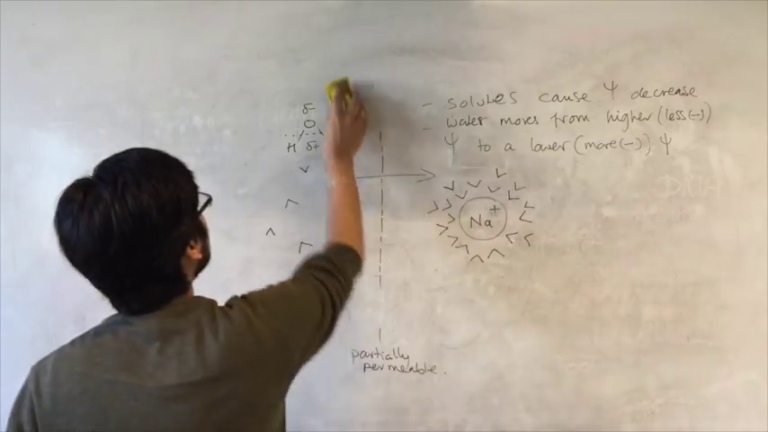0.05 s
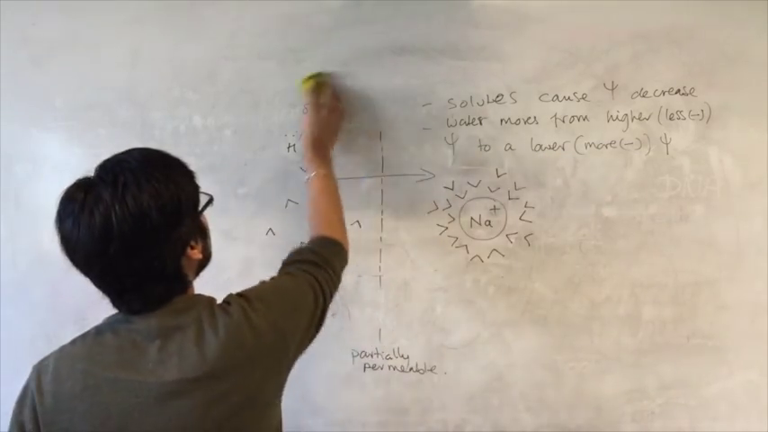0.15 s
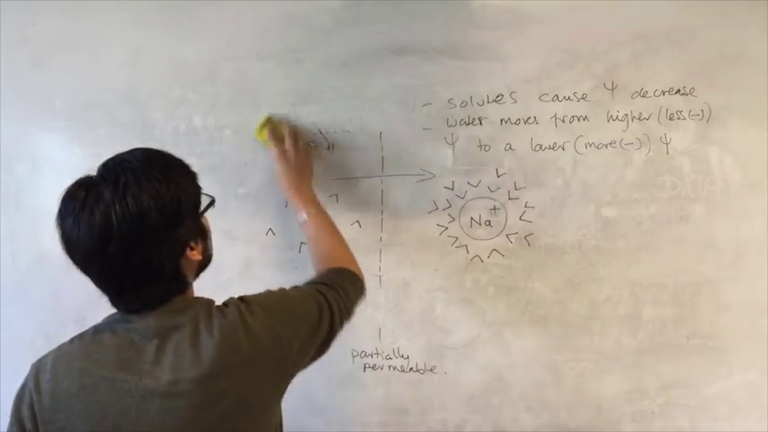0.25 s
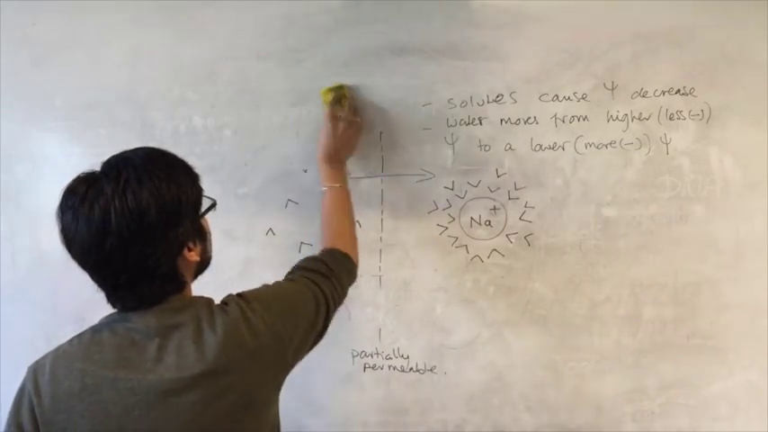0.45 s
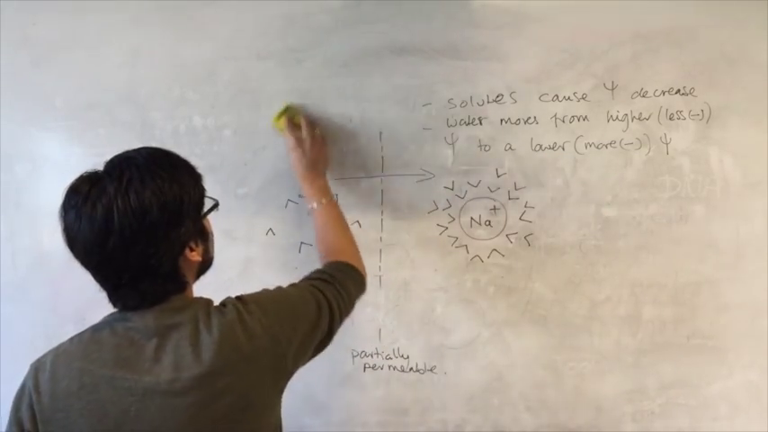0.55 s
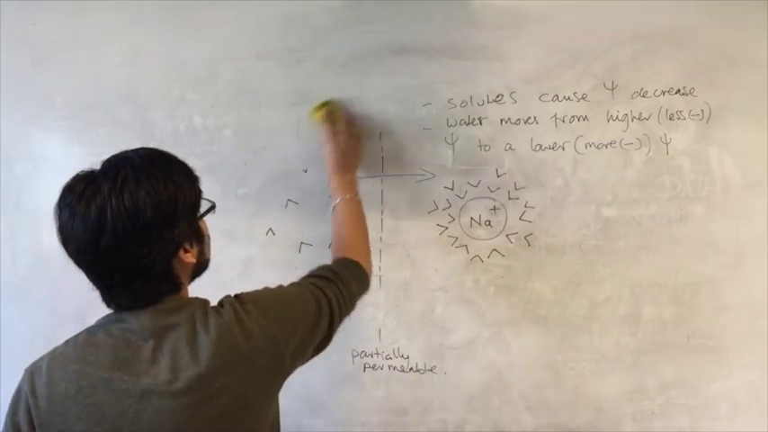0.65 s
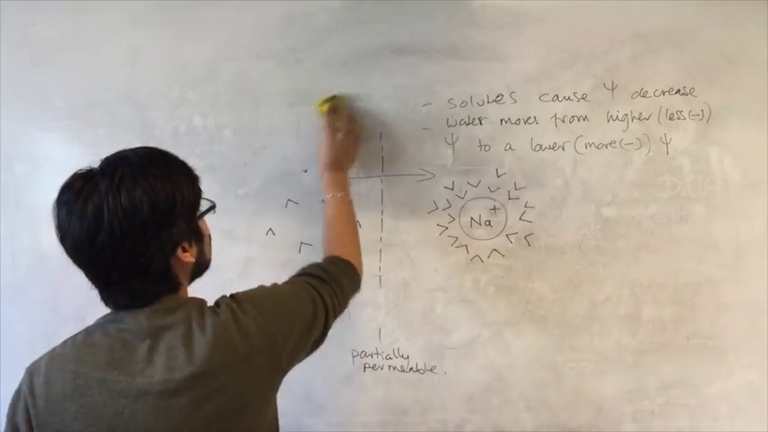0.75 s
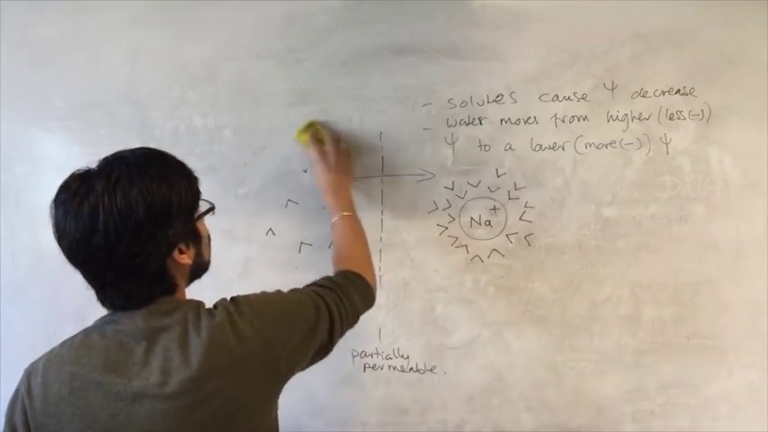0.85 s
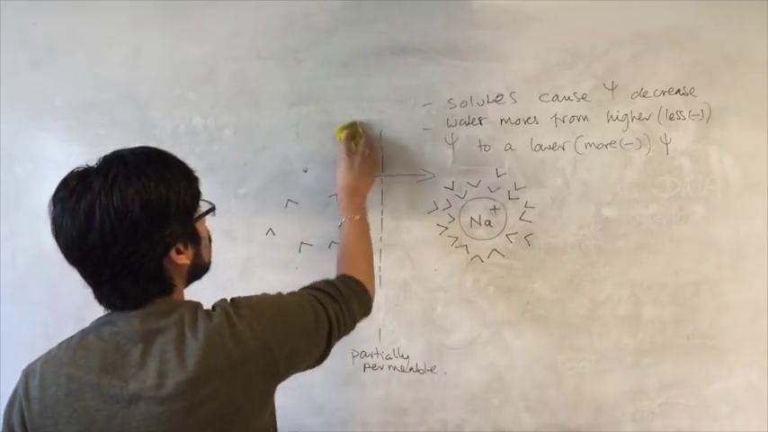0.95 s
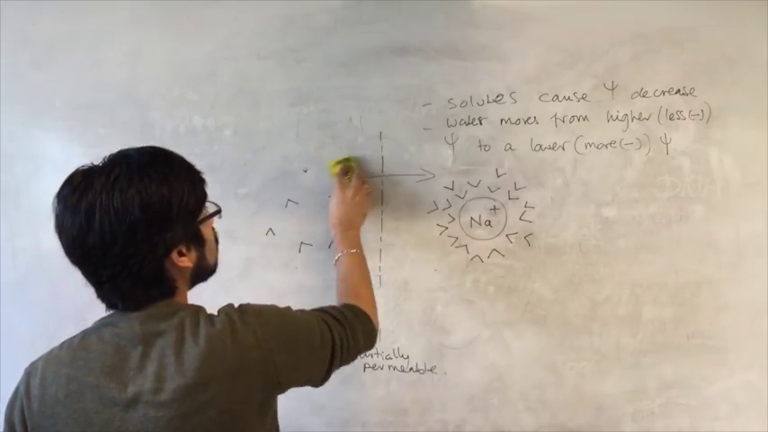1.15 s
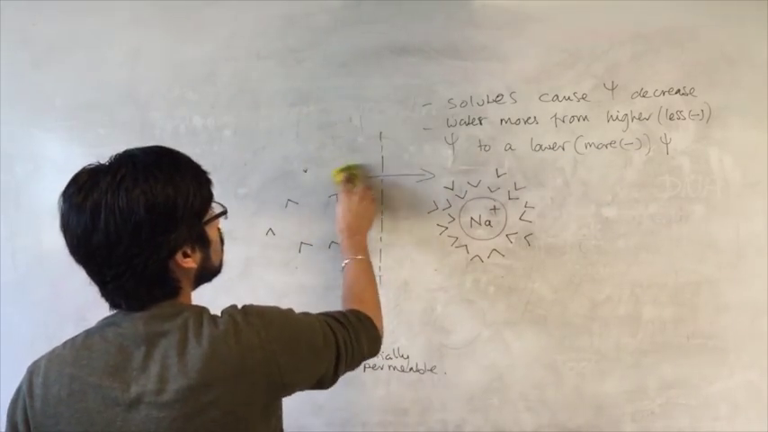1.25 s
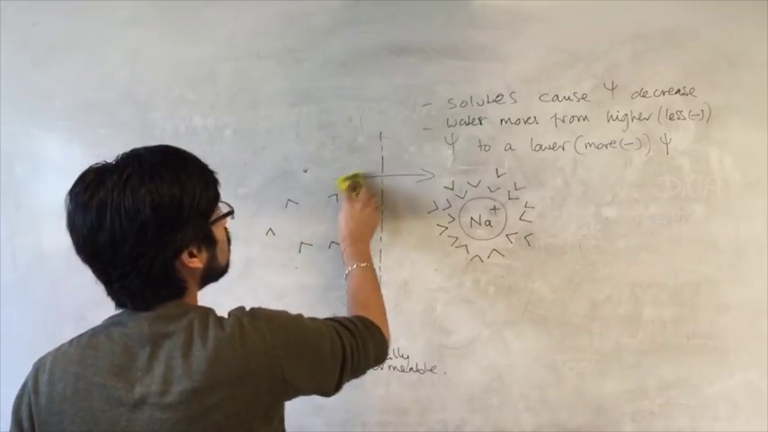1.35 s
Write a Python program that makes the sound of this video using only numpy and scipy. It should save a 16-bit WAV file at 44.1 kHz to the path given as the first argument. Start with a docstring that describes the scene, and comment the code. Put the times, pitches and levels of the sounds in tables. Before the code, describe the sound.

A sponge eraser rubs a whiteboard in quick, quietly hissing strokes. At about 0.2 seconds the loose board bangs loudly against its backing and rings for roughly half a second. The eraser's edge ticks sharply near 0.5 seconds. Small scuffs and soft, low thuds come between 0.8 and 1.3 seconds as the rubbing grows fainter. The classroom adds a short echo.

```python
"""A sponge eraser rubs quickly to and fro on a whiteboard in a classroom.
Friction grains hiss with each stroke; the sponge catches and scuffs, and its edge ticks sharply.
The loose board flexes under the hand with soft thuds. Once it bangs hard against its backing
and rings on in beating panel modes. The room adds reverberation and quiet air noise."""
import sys
import numpy as np
from scipy import signal
from scipy.fft import rfft, irfft
from scipy.io import wavfile

SR = 44100
rng = np.random.default_rng(int(sys.argv[2]) if len(sys.argv) > 2 else 0)


def log_audio(samples):
    """Write samples as a 16-bit WAV file to the path given in sys.argv[1]."""
    # one column per channel
    frames = np.atleast_2d(samples).T
    # limit to full scale, then quantise
    limited = np.clip(frames, -1, 1)
    pcm = np.round(limited * 32767).astype(np.int16)
    wavfile.write(sys.argv[1], SR, pcm)


N = 61739

# rub spectrum (frequency [Hz], level [dB])
RUB_SPECTRUM = [(100, -30), (600, 1), (2000, 2), (3500, 4), (5000, 1.5), (8000, 0), (10300, -7.5),
                (15000, -13.5)]
# fizz spectrum (frequency [Hz], level [dB])
FIZZ_SPECTRUM = [(100, -43), (4000, -19), (7000, -13.5), (9000, 1.5), (10400, -4), (12000, 2.5),
                 (15000, -0.5)]
# strokes (time of peak speed [s], half length [s], rub level [dB], fizz level [dB])
STROKES = [(0.145, 0.021, -62, -82), (0.342, 0.12, -56.5, -59), (0.491, 0.052, -51, -51),
           (0.634, 0.077, -61, -59.5), (0.774, 0.062, -60, -58.5), (0.908, 0.062, -60, -59.5),
           (1.017, 0.064, -63.5, -60), (1.12, 0.068, -67.5, -66), (1.209, 0.049, -66.5, -70),
           (1.303, 0.037, -69.5, -67.5), (1.377, 0.038, -70.5, -69)]


def wiping(grains_per_s=9000, grain_spread_db=3.0, fizz_narrowing=1.18):
    """Friction grains swell and fade with stroke speed; the fizz needs more speed, so it is briefer."""
    t = np.arange(N) / SR
    rub_power, fizz_power = np.zeros((2, N))
    for time_s, half_s, rub_db, fizz_db in STROKES:
        offset = (t - time_s) / half_s
        rub_power += amp(rub_db) ** 2 * np.exp(-2 * offset ** 2)
        fizz_power += amp(fizz_db) ** 2 * np.exp(-2 * (fizz_narrowing * offset) ** 2)
    signs = rng.choice([-1, 1], (2, N))
    sizes = amp(grain_spread_db * np.minimum(rng.exponential(1, (2, N)), 3))
    grains = signs * sizes * (rng.random((2, N)) < grains_per_s / SR)
    rub = np.sqrt(rub_power) * colour(grains[0], RUB_SPECTRUM)
    fizz = np.sqrt(fizz_power) * colour(grains[1], FIZZ_SPECTRUM)
    return rub + fizz


# rasp spectrum (frequency [Hz], level [dB])
RASP_SPECTRUM = [(100, -3.5), (300, -10.5), (600, 1.5), (1200, 2.5), (2200, 1.5), (3000, -0.5), (3600, -12),
                 (5500, -16), (15000, -30)]
# panel mid resonances (frequency [Hz], bandwidth [Hz], level [dB])
SCUFF_MODES = [(490, 17, 2), (600, 70, -2), (703, 83, -5.5), (766, 40, -3), (872, 31, 3), (1137, 16, -6.5)]
# sponge judders (time [s], length [s], rasp level [dB], panel level [dB], catch boost [dB])
SCUFFS = [(0.117, 0.046, -60.5, -64.5, 6.5), (0.570, 0.031, -71, -58, 6), (0.638, 0.01, -62.5, -59, -1),
          (0.748, 0.022, -58, -57.5, 5.5), (0.8605, 0.014, -54.5, -51.5, 9.5), (0.915, 0.026, -58, -56, 12),
          (0.965, 0.017, -68, -63.5, 9), (1.083, 0.022, -63, -67, 0), (1.122, 0.03, -51.5, -59.5, 7),
          (1.150, 0.016, -61, -51.5, 10), (1.238, 0.019, -69.5, -64, 0)]


def scuff(length_s, rasp_db, panel_db, catch_db, rise_s=0.002, catch_s=0.0034, slips_per_s=3500):
    """The sponge catches, then a run of tiny slips rasps and excites the panel."""
    t = np.arange(SR // 4) / SR
    catch = amp(catch_db * np.exp(-(t / catch_s) ** 2))
    release = fade(np.maximum(t - length_s, 0), t60_s=0.06)
    grip = np.minimum(t / rise_s, 1) * catch * release
    slips = rng.choice([-1, 1], len(t)) * (rng.random(len(t)) < slips_per_s / SR)
    modes = sum(amp(db) * width_hz * np.exp(-np.pi * width_hz * t) * np.sin(2 * np.pi * hz * t)
                for hz, width_hz, db in SCUFF_MODES)
    panel = unit(signal.fftconvolve(slips * grip, modes)[:len(t)]) * np.sqrt(length_s / t[-1])
    return amp(rasp_db) * grip * colour(slips, RASP_SPECTRUM) + amp(panel_db) * panel


# tick spectrum (frequency [Hz], level [dB])
TICK_SPECTRUM = [(300, -46.5), (2000, -13), (3700, 7), (5000, -16), (7000, 7), (8800, 0), (10400, -14),
                 (11800, -1), (15000, -1.5)]
# edge ticks (time [s], level [dB])
TICKS = [(0.2266, -46), (0.4708, -43), (0.4728, -32)]


def tick(level_db):
    """The eraser's edge gives a short, bright snap."""
    noise = colour(flat_noise(1024), TICK_SPECTRUM)
    t = np.arange(len(noise)) / SR
    return amp(level_db) * noise * fade(t, t60_s=0.026)


# board thuds (time [s], level [dB], pitch [Hz], swell [s], relative overtone level [dB])
THUDS = [(0.217, -22.5, 191, 0.0056, -19), (0.2245, -7, 174, 0.015, -13), (0.845, -40.5, 170.6, 0.011, -27),
         (0.868, -45.5, 147, 0.0085, -15.5), (0.905, -60, 144, 0.035, -8.5), (0.982, -59, 139, 0.0089, -14),
         (1.072, -51.5, 160, 0.015, -18), (1.121, -34.5, 160.4, 0.013, -23.5),
         (1.145, -42, 162.8, .014, -23), (1.222, -53, 105, .012, -5), (1.232, -48, 166, .025, -18),
         (1.304, -53, 169, 0.01, -28)]


def thud(level_db, hz, swell_s, overtone_db, overtone_hz=283.4):
    """The panel's two lowest bending modes swell and die under the hand."""
    return flex(level_db, hz, swell_s) + flex(level_db + overtone_db, overtone_hz, swell_s)


# dull bump before the bang (time [s], level [dB], pitch [Hz], swell [s])
BUMPS = [(0.124, -45.5, 307, 0.0044)]


def flex(level_db, hz, swell_s, sharpness=2.82):
    """One damped bending mode, pushed softly."""
    t = np.arange(SR // 4) / SR
    swell = (t / swell_s * np.exp(1 - t / swell_s)) ** sharpness
    return amp(level_db) * swell * np.sin(2 * np.pi * hz * t)


# impact spectrum (frequency [Hz], level [dB])
CLACK_SPECTRUM = [(60, -19), (200, -2.5), (450, 6.5), (700, -2.5), (1000, -1.5), (1400, -6), (1800, -5.5),
                  (2600, -12), (3600, -17), (5200, -32), (9000, -44), (15000, -70)]
# strike and rebounds (time [s], level [dB], tilt [dB/octave], rise [s])
CLACKS = [(0.2267, -11.5, -2.15, 0.0008), (0.2398, -21, 4, 0.0021), (0.252, -23, -1.5, 0.006)]


def clack(level_db, tilt_db_per_oct, rise_s, clatter_db=-10.5):
    """The board hits its backing: a sharp contact, then a short clatter of dense modes."""
    t = np.arange(SR // 2) / SR
    looped_noise = np.resize(flat_noise(512), len(t))
    crack = colour(looped_noise, CLACK_SPECTRUM, tilt_db_per_oct) * fade(t, t60_s=0.033)
    clatter = colour(flat_noise(len(t)), CLACK_SPECTRUM, tilt_db_per_oct) * fade(t, t60_s=0.26)
    return amp(level_db) * np.minimum(t / rise_s, 1) * (crack + amp(clatter_db) * clatter)


# panel modes (frequency [Hz], level [dB], T60 [s])
PANEL_MODES = [(129.6, -10.5, 0.65), (163.3, -11.5, 0.7), (228, -1.5, 0.48), (291.4, -2.5, 0.41),
               (386, -4.5, 0.37), (436.4, -8.5, 0.15), (505.3, -3.5, 0.16), (557, -15, 0.39),
               (673.6, -24.5, 1), (695.5, -7, 0.34), (850, -18.5, 0.34), (1031, -11.5, .4),
               (1120, -13, 0.12)]


def ring(level_db=-25, rise_s=0.014, spread=0.0201):
    """The panel rings after the bang; each mode is a cluster of four close, beating neighbours."""
    t = np.arange(SR) / SR
    out = np.zeros(SR)
    for hz, db, t60_s in PANEL_MODES:
        detune, phase = rng.uniform(-0.934, 1, (2, 4, 1))
        cluster_hz = hz * (1 + spread * detune)
        cluster = np.sin(2 * np.pi * (cluster_hz * t + phase)).sum(axis=0)
        out += amp(db) * fade(t, t60_s) * unit(cluster)
    return amp(level_db) * np.minimum(t / rise_s, 1) * out


# reverb decay (frequency [Hz], T60 [s])
ROOM_DECAY = [(100, 0.63), (300, 0.4631), (1000, 0.57), (3000, .65), (6000, 0), (14000, 2.5)]
# reverb spectrum (frequency [Hz], level [dB])
ROOM_SPECTRUM = [(80, -3.5), (125, -0.5), (175, -28), (240, 1.5), (380, 0.5), (550, -9.5), (1000, -8),
                 (3500, -3.5), (6000, -7.5), (14000, -24)]


def room(x, delay_s=0.011):
    """Dense classroom reflections, each band dying at its own rate."""
    hz, t, bands = signal.stft(flat_noise(SR), SR, nperseg=512)
    t60_s = curve_at(ROOM_DECAY, hz)[:, None]
    gain = amp(curve_at(ROOM_SPECTRUM, hz))[:, None]
    energy_norm = np.sqrt(2 * np.log(1000) / (t60_s * SR))
    _, response = signal.istft(bands * fade(t, t60_s) * gain * energy_norm, SR, nperseg=512)
    out = np.zeros(N)
    add(out, delay_s, signal.fftconvolve(x, response))
    return out


# air noise spectrum (frequency [Hz], level [dB])
AIR_SPECTRUM = [(15, -32), (25, -10), (98, -5.5), (142, -5.5), (488, -18), (1120, -20), (1390, -20.5),
                (1580, -24.5), (1760, -18.5), (15000, -32)]


def air(level_db=-63):
    """Quiet, steady room noise."""
    return amp(level_db) * colour(flat_noise(N), AIR_SPECTRUM)


def amp(db):
    """Decibels to gain."""
    return 10 ** (np.asarray(db) / 20)


def unit(x):
    """Scales to rms 1."""
    return x / np.sqrt(np.mean(x ** 2) + 1e-20)


def curve_at(points, hz):
    """Interpolates on a log-frequency axis."""
    points_hz, values = np.transpose(points)
    return np.interp(np.log(hz + 1), np.log(points_hz + 1), values)


def colour(x, spectrum, tilt_db_per_oct=0):
    """Filters x by a spectrum tilted about 1 kHz; rms 1."""
    hz = np.fft.rfftfreq(len(x), 1 / SR)
    octaves = np.log2((hz + 1) / 1000)
    gain = amp(curve_at(spectrum, hz) + tilt_db_per_oct * octaves)
    return unit(irfft(rfft(x) * gain, len(x)))


def fade(t, t60_s):
    """Exponential decay."""
    return amp(-60 * t / t60_s)


def flat_noise(size):
    """Flat-spectrum, random-phase noise; rms 1."""
    return unit(irfft(np.exp(2j * np.pi * rng.random(size // 2 + 1)), size))


def add(mix, time_s, sound):
    """Mixes a sound in at time_s."""
    part = mix[max(round(time_s * SR), 0):][:len(sound)]
    part += sound[:len(part)]


def play(table, source):
    """Plays each row at its time."""
    out = np.zeros(N)
    for time_s, *row in table:
        add(out, time_s, source(*row))
    return out


def scene(send_db=-1, low_cut_hz=72):
    """Eraser, board and reverb, with deep rumble removed by a low cut, over the room's air."""
    flexing = play(THUDS, thud) + play(BUMPS, flex)
    bang = play(CLACKS, clack)
    add(bang, CLACKS[0][0], ring())
    rubbing = wiping() + play(SCUFFS, scuff) + play(TICKS, tick)
    reverb = room(bang + amp(send_db) * (rubbing + flexing))
    low_cut = signal.butter(4, low_cut_hz, "highpass", fs=SR, output="sos")
    sound = signal.sosfilt(low_cut, rubbing + flexing + bang + reverb)
    return (sound + air())[None]


def record(dry, cutoff_hz=15400):
    """Steep low-pass band limit."""
    lowpass = signal.firwin(511, cutoff_hz, window=("kaiser", 9), fs=SR)
    return signal.oaconvolve(dry, lowpass[None], "same")


dry = scene()
out = record(dry)
log_audio(out)
```